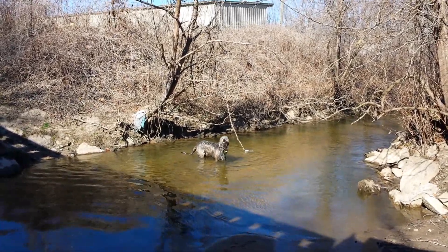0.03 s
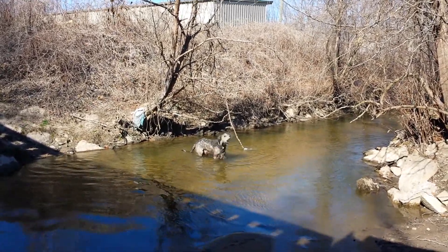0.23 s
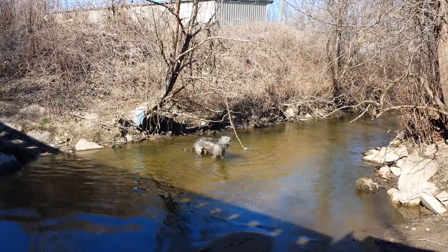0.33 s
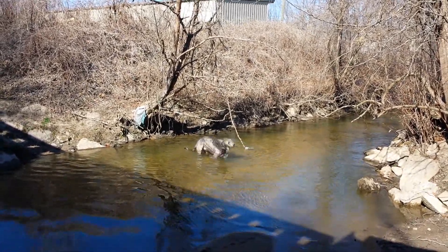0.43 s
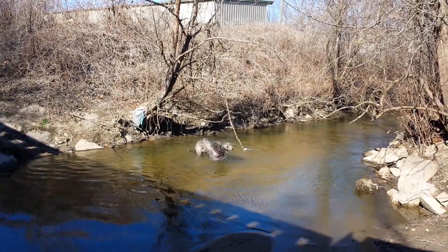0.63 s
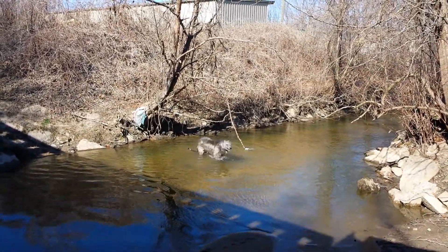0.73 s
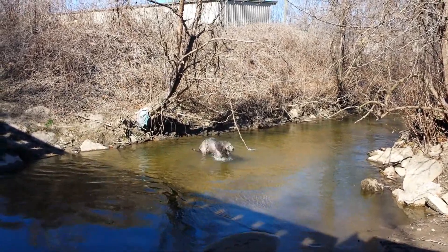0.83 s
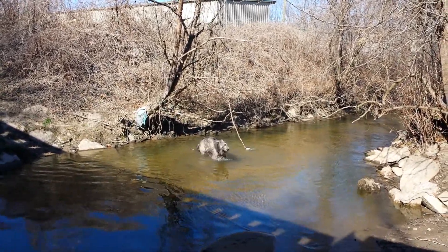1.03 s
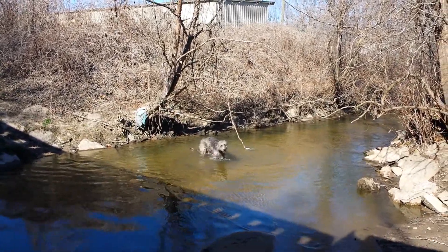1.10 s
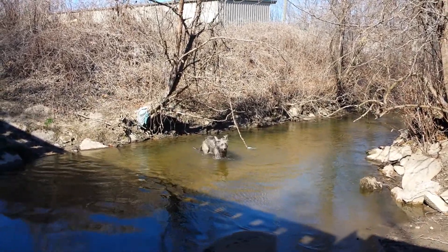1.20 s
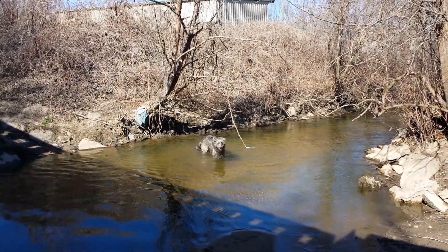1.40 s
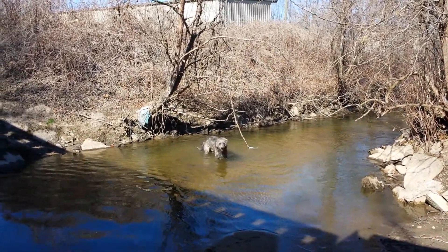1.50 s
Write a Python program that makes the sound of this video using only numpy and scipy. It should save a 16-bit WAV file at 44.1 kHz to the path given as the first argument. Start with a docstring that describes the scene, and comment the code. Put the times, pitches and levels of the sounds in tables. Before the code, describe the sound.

A wet dog shakes itself in a shallow creek. Light pattering builds into sloshing fur and spray while its collar buckle clacks and metal tags jingle, then everything eases off over a faint wash of water.

```python
"""Water patters faintly over a low rumble, then builds as a wet dog shakes itself in a shallow creek.
Its coat sloshes and slaps, flinging drops that land as ticks, ringing bubbles and a hiss of spray.
The collar buckle clacks and two metal tags jingle, each knock choking the ring before it.
The banks add a short echo; the wash of the creek and a faint far whine lie behind."""
import sys
import numpy as np
from scipy import signal
from scipy.fft import rfft, irfft
from scipy.io import wavfile

SR = 44100
rng = np.random.default_rng(int(sys.argv[2]) if len(sys.argv) > 2 else 0)


def unload_wav(signal):
    """Save mono or channel-first audio to the path in sys.argv[1] as 16-bit WAV at rate SR, clipped to [-1, 1]."""
    wavfile.write(
        sys.argv[1],
        SR,
        np.round(np.clip(np.atleast_2d(signal).T, -1, 1) * 32767).astype(np.int16),
    )


N = 68355
T = np.arange(N) / SR
WET_RISE_S = 0.00048  # attack of slaps and plops
SHARP_RISE_S = 0.00027  # attack of sharp drops and the buckle's tick
TICK_DECAY_S = 0.0036  # contact noise of metal on metal


def undb(db):
    """Decibels to gain."""
    return 10 ** (np.asarray(db) / 20)


def unit(x):
    """Scale to rms 1."""
    return x / np.sqrt(np.mean(x ** 2) + 1e-18)


def add(out, start, x):
    """Mix x into out from a start time in seconds."""
    i = int(np.clip(start * SR, 0, N - 1))
    out[i:i + len(x)] += x[:N - i]


def coloured(x, points):
    """Shape x with an EQ curve of (frequency_hz, gain_db) points; rms 1."""
    hz, db = np.array(points, float).T
    freqs = np.maximum(np.fft.rfftfreq(len(x), 1 / SR), 1)
    curve_db = np.interp(np.log(freqs), np.log(hz), db, left=-80, right=-80)
    return unit(irfft(rfft(x) * undb(curve_db), len(x)))


def burst(hz, octaves, rise_s, decay_s, size=8192):
    """A puff of noise in a bell-shaped band round a centre frequency."""
    t = T[:size]
    freqs = np.maximum(np.fft.rfftfreq(size, 1 / SR), 1)
    band = np.exp(-.5 * (np.log2(freqs / hz) / octaves) ** 2)
    envelope = (1 - np.exp(-t / rise_s)) * np.exp(-t / decay_s)
    puff = irfft(rfft(rng.standard_normal(size)) * band) * envelope
    return puff * np.sqrt(np.sum(envelope ** 2) / np.sum(puff ** 2)) / envelope.max()


def ring(modes, detune, scatter_db, rise_s=.0011, tumble_hz=38.2, tumble_depth=.56, size=16384):
    """Struck metal: each contact shifts the tuning and mix of its modes, which waver as it tumbles."""
    t = T[:size]
    hz, db, t60 = np.array(modes, float).T[:, :, None]
    shift, loudness, phase, spin, angle = rng.standard_normal((5, len(modes), 1))
    gain = undb(db + scatter_db * loudness)
    gain *= np.sqrt(2 * np.sum(undb(db) ** 2) / np.sum(gain ** 2))  # same total power in any mix
    tumble = 1 + tumble_depth * np.sin(2 * np.pi * (tumble_hz * np.exp(spin / 2) * t + angle))
    fade = np.exp(-np.log(1000) * t / t60)
    tones = np.sin(2 * np.pi * (hz * (1 + detune * shift) * t + phase))
    return (gain * tumble * fade * tones).sum(0) * (1 - np.exp(-t / rise_s))


def choked(x, gap_s, choke_s=.017):
    """The next contact, gap_s later, damps what still rings."""
    return x * np.exp(-np.maximum(T[:len(x)] - gap_s, 0) / choke_s)


def shower(colour, per_s, decay_cycles, spread_db, glide, rise_share=.52):
    """A steady shower of tiny bubbles that chirp upward, a few much louder than the rest."""
    when, pitch, chance = rng.random((8000, 3))[:int(per_s * N / SR)].T
    low_hz, high_hz = colour[0][0], colour[-1][0]
    hz = low_hz * (high_hz / low_hz) ** pitch
    size = int(min(1024, 2 * np.pi * decay_cycles * SR / low_hz))
    cycles = hz[:, None] * T[:size]
    age = cycles / decay_cycles
    strength = undb(-spread_db * np.log(1 - .995 * chance)) * np.sqrt(hz / high_hz)
    envelope = np.exp(-age) * (1 - np.exp(-age / rise_share)) ** 2
    bend = 1 + glide * (1 - np.exp(-age / 2))
    bubbles = strength[:, None] * envelope * np.sin(2 * np.pi * cycles * bend)
    positions = (when * N).astype(int)[:, None] + np.arange(size)
    return coloured(np.bincount(positions.ravel(), bubbles.ravel(), N)[:N], colour)


def rumble():
    """Distant low noise that swells with the shake and dips briefly near the end."""
    # level curve: time_s, level_db
    swell = [(0.0, -63), (0.344, -55), (1.118, -51.5), (1.182, -64), (1.216, -50.5), (1.364, -59.5),
             (1.55, -59.5)]
    # bass-heavy EQ: frequency_hz, gain_db
    colour = [(20, -20), (45, -12.5), (72, -2), (90, -4.5), (108, -1), (135, -15.5), (220, -21.5),
              (400, -19)]
    return undb(np.interp(T, *np.array(swell).T)) * coloured(rng.standard_normal(N), colour)


def creek_and_whine(whine_hz=1201):
    """The soft wash of the creek and a thin far tone fade up together, then hold."""
    # EQ of the wash: frequency_hz, gain_db
    colour = [(130, 10), (300, 0), (900, -6), (2000, -11),
              (4000, -16.5), (6500, -17), (9000, -21), (15500, -18)]
    wash = undb(-64.5) * coloured(rng.standard_normal(N), colour)
    whine = undb(-67.5) * unit(np.sin(2 * np.pi * whine_hz * T))
    fade_in_db = np.interp(T, [0, .32], [-7.5, 0])
    return (wash + whine) * undb(fade_in_db)


def flung_water():
    """Sloshing fur, drops pattering on the creek and fine spray swell and fade with the shake."""
    # fader moves on top of each layer's own gain: time_s, slosh_db, patter_db, spray_db
    faders = [(0.0, -63, -71, -78), (0.056, -75, -78, -94), (0.098, -63, -70.5, -64.5),
              (0.262, -68.5, -61, -84), (0.31, -53, -47, -62), (0.344, -100, -53, -60.5),
              (0.384, -54.5, -52.5, -59), (0.448, -54, -43.5, -56), (0.574, -39.5, -45.5, -50.5),
              (0.626, -47.5, -45, -57), (0.75, -42, -41, -51.5), (0.928, -55, -46, -54),
              (0.954, -51.5, -42.5, -53.5), (1.138, -60.5, -56.5, -60), (1.41, -66.5, -69.5, -78),
              (1.55, -71, -66.5, -79)]
    # EQ of each layer: frequency_hz, gain_db
    slosh_eq = [(130, -16), (200, 0.5), (300, 2.5), (400, 2), (480, 2.5), (680, 4.5), (800, 2)]
    patter_eq = [(600, -7.5), (740, -5.5), (950, -1), (1190, -2), (1340, -10), (1520, 2.5), (2200, 1),
                 (2800, -8.5), (3600, -15)]
    spray_eq = [(2200, 5), (3000, 4.5), (4000, -3), (5000, -2.5), (6200, 8.5), (8400, -5.5), (11000, -13),
                (14000, -30)]
    mist_eq = [(2200, 2), (3000, 0), (4000, -3), (5000, -1), (6200, 10.5), (7400, -1.5), (8400, -7.5),
               (11000, -7), (12800, -14), (15500, -12)]
    mist = undb(5) * coloured(rng.standard_normal(N), mist_eq)  # the finest drops merge into hiss
    slosh = undb(-3) * shower(slosh_eq, per_s=500, decay_cycles=2.97, spread_db=2, glide=.069)
    patter = undb(2) * shower(patter_eq, per_s=1100, decay_cycles=3.44, spread_db=1, glide=.1)
    spray = undb(3.5) * shower(spray_eq, per_s=1800, decay_cycles=3.6, spread_db=3, glide=.066)
    times, *levels = np.array(faders).T
    layers = [slosh, patter, spray + mist]
    return sum(undb(np.interp(T, times, db)) * layer for db, layer in zip(levels, layers))


def plops(glide=.049):
    """Larger drops trap bubbles that ring and rise a little in pitch."""
    # bubbles and after-drips: start_s, pitch_hz, level_db, decay_s
    bubbles = [(0.082, 1574, -43.5, 0.0042), (.153, 1980, -52, 0.016), (.213, 888, -54, 0.017),
               (.372, 231, -50, 0.011), (.380, 608.4, -48, 0.035), (.490, 967, -40, 0.033),
               (.685, 460, -42.5, 0.02), (0.954, 274.6, -50.5, 0.054), (.755, 458, -39.5, 0.024),
               (.997, 930, -44, 0.0042), (1.113, 1110, -55, 0.014), (1.235, 748, -53.5, 0.026),
               (1.26, 1500, -45.5, 0.0064), (1.321, 2570, -55.5, 0.0067), (1.400, 2310, -63, 0.012),
               (1.410, 920, -60, 0.013), (1.421, 2330, -53.5, 0.0042)]
    out = np.zeros(N)
    for start, hz, db, decay in bubbles:
        pitch_hz = hz * (1 + glide * (.5 - np.exp(-T / decay / 2)))
        tone = np.sqrt(2) * np.sin(2 * np.pi * np.cumsum(pitch_hz) / SR)
        envelope = np.exp(-T / decay) * (1 - np.exp(-T / WET_RISE_S))
        add(out, start, undb(db) * tone * envelope)
    return out


def coat_slaps():
    """Wet ears and fur smack against the body in short puffs of noise."""
    # wet smacks: start_s, centre_hz, width_octaves, level_db, decay_s
    slaps = [(.083, 1390, 0.69, -44, 0.0057), (.111, 2050, 0.13, -50, .009), (.215, 3700, 1, -47.5, 0.01),
             (.233, 2210, 0.13, -37.5, 0.0057), (.297, 1020, 0.34, -38.5, 0.0023),
             (.311, 824, 0.33, -40.5, 0.0056), (.428, 1150, 0.27, -41.5, 0.029),
             (.448, 1230, 0.49, -35, .007), (.462, 2570, 0.31, -36.5, 0.0047),
             (.551, 3190, 0.18, -38.5, 0.013), (.686, 655, 0.63, -35.5, 0.0086),
             (.753, 807, 0.35, -35.5, 0.013), (.763, 413, 0.54, -36, 0.0061),
             (.866, 1100, 0.28, -48, 0.0076), (.964, 880, 0.19, -36, 0.0027),
             (.997, 870, 0.12, -37.5, 0.0027), (1.215, 2160, 0.17, -43.5, 0.018)]
    out = np.zeros(N)
    for start, hz, octaves, db, decay in slaps:
        add(out, start, undb(db) * burst(hz, octaves, WET_RISE_S, decay))
    return out


def sharp_drops():
    """Single drops land with a bright tick."""
    # landings: start_s, level_db
    drops = [(0.086, -47), (0.124, -46), (.173, -57), (1.049, -44), (1.142, -44.5)]
    out = np.zeros(N)
    for start, db in drops:
        add(out, start, undb(db) * burst(hz=4970, octaves=.75, rise_s=SHARP_RISE_S, decay_s=.0027))
    return out


def buckle():
    """The heavier collar fitting clacks as the neck swings: a tick and a midrange ring."""
    # buckle hits: start_s, level_db
    clacks = [(0.152, -44.5), (0.251, -39), (0.285, -30), (0.365, -23.5), (0.389, -38), (0.431, -37),
              (0.457, -28.5), (0.517, -27), (.550, -21.5), (.577, -37), (.606, -29), (0.637, -32),
              (.743, -23), (0.833, -30), (0.858, -39.5), (0.932, -29.5), (0.973, -49), (1.024, -35),
              (1.06, -39), (1.086, -36), (1.216, -36), (1.236, -33), (1.505, -49.5)]
    # buckle resonances: pitch_hz, gain_db, t60_s
    modes = [(1514, -17.5, .08), (1740, -9.5, 0.21), (1838, -8.5, 0.044), (2256, -20, 0.032),
             (2225, -24.5, 0.13), (3120, -22, 0.027)]
    out = np.zeros(N)
    gaps = np.diff([row[0] for row in clacks], append=np.inf)
    for (start, db), gap in zip(clacks, gaps):
        metal = ring(modes, detune=.005, scatter_db=4, rise_s=.0013)
        tick = burst(hz=2700, octaves=1, rise_s=SHARP_RISE_S, decay_s=TICK_DECAY_S)
        add(out, start, undb(db) * choked(metal, gap))
        add(out, start, undb(db - 20) * tick)
    return out


def tags(bounce_db=-6.5):
    """Two metal tags knock and bounce once: ticks, two rings near 7 kHz and short bright overtones."""
    # tag hits: start_s, large_db, small_db, bright_db
    strikes = [(.153, -51, -45.5, -59), (.172, -38, -47, -50.5), (.222, -44, -43, -63),
               (.232, -35, -32.5, -44), (.241, -31, -34.5, -80), (.267, -55, -47, -54),
               (.298, -42, -38, -50), (0.332, -40.5, -48, -56), (0.357, -44, -55, -50.5),
               (.369, -42, -39, -53), (.395, -35, -48, -51), (.408, -33, -41, -44.5), (.432, -35, -38, -57),
               (.446, -38, -37, -44), (.478, -44, -47, -71), (.523, -26.5, -30.5, -33.5),
               (.551, -24.5, -28.5, -37.5), (.564, -30, -21.5, -39.5), (.583, -32, -29, -55),
               (.599, -33, -43, -40.5), (.616, -32, -44, -37), (.637, -29, -31, -40),
               (.655, -29.5, -37.5, -44), (.677, -30, -31, -45.5), (.742, -34, -30.5, -40.5),
               (.783, -26, -31, -46), (.798, -25.5, -39, -35), (.816, -26, -27, -37.5),
               (.832, -24.5, -40, -53), (.852, -29.5, -32.5, -46), (.869, -38, -40, -51),
               (.895, -38, -42, -48), (.913, -32, -37, -45), (.929, -29.5, -39, -59),
               (0.942, -29.5, -40, -35.5), (.957, -35, -39, -69), (.979, -34, -33.5, -55),
               (.996, -41, -41, -61), (1.022, -39.5, -51, -55), (1.060, -43, -43.5, -56),
               (1.082, -51, -53, -53), (1.2149, -29, -44, -37), (1.238, -35.5, -54, -80),
               (1.252, -38.5, -45, -52.5), (1.380, -63, -54.5, -61.5), (1.408, -56.5, -58, -59),
               (1.501, -45.5, -48.5, -54.5), (1.519, -45, -53, -70)]
    # resonances of each tag and their bright overtones: pitch_hz, gain_db, t60_s
    large_tag = [(4268, -38, 0.27), (5613, -21.5, 0.16), (6473, -9.5, 0.11), (6570, -5.5, 0.17)]
    small_tag = [(3404, -24, 0.17), (6970, -9.5, 0.12), (6986, -6, 0.16), (7820, -29.5, 0.074)]
    overtones = [(10070, -11.5, 0.08), (10930, -11.5, 0.069), (10710, -7.5, 0.061), (10640, -10.5, .07),
                 (12000, -14.5, 0.051), (15200, -19, 0.048)]
    out = np.zeros(N)
    gaps = np.diff([row[0] for row in strikes], append=np.inf)
    for (start, large_db, small_db, bright_db), gap in zip(strikes, gaps):
        metal = undb(large_db) * ring(large_tag, detune=.00441, scatter_db=5)
        metal += undb(small_db) * ring(small_tag, detune=.00441, scatter_db=5)
        metal += undb(bright_db) * ring(overtones, detune=.0063, scatter_db=5.5)
        add(out, start, choked(metal, gap))
        bounce_s = rng.uniform(.003, .016)
        add(out, start + bounce_s, undb(bounce_db) * choked(metal, gap - bounce_s))
        tick = burst(hz=6250, octaves=.14, rise_s=.0011, decay_s=TICK_DECAY_S)
        bright_tick = burst(hz=10620, octaves=.097, rise_s=.0011, decay_s=.0032)
        add(out, start, undb(large_db - 13) * tick + undb(bright_db - 3.5) * bright_tick)
    return out


def bank_echo(x, level_db=-12.5, t60_s=.29, delay_s=.018):
    """The creek banks scatter the sound back as a short diffuse tail."""
    tail = rng.standard_normal(N) * np.exp(-np.log(1000) * T / t60_s) * (T > delay_s)
    tail /= np.sqrt(np.sum(tail ** 2))
    return undb(level_db) * signal.fftconvolve(x, tail)[:N]


def scene():
    """The shaking dog and its echo over the background bed, in mono."""
    bed = rumble() + creek_and_whine()
    dog = flung_water() + plops() + coat_slaps() + sharp_drops() + buckle() + tags()
    return (dog + bank_echo(dog) + bed)[None]


def record(dry):
    """A steep low-pass trims the very top of the treble."""
    cutoff_hz = 15650
    return signal.sosfilt(signal.ellip(10, .2, 80, cutoff_hz, fs=SR, output="sos"), dry)


dry = scene()
out = record(dry)
unload_wav(out)
```